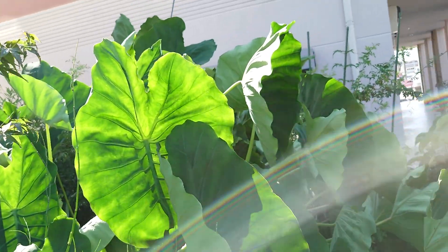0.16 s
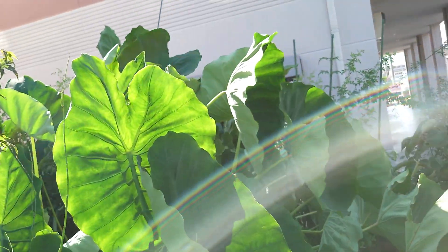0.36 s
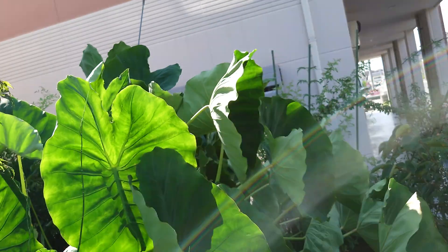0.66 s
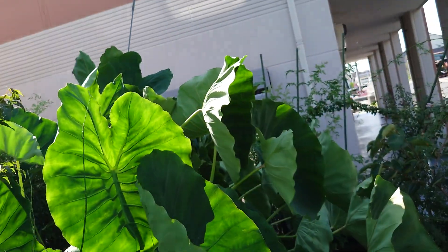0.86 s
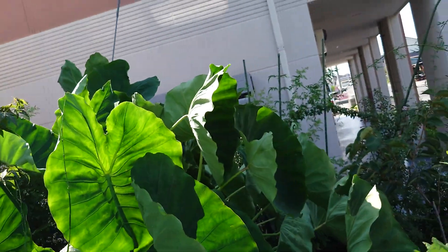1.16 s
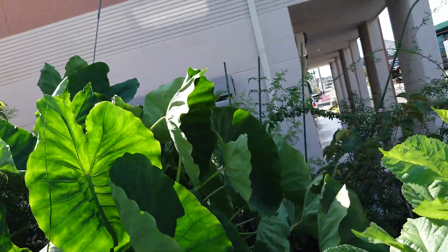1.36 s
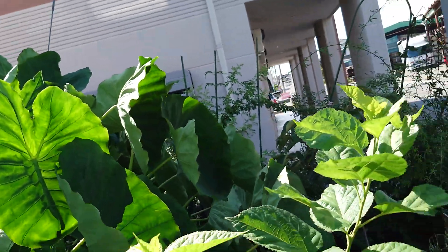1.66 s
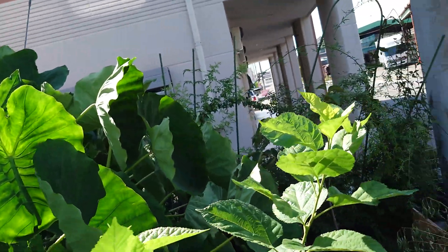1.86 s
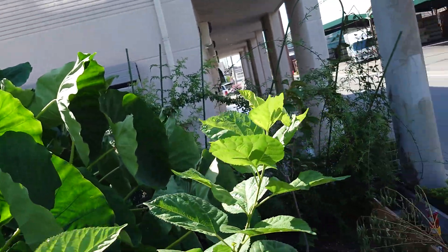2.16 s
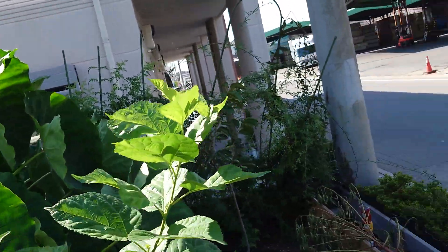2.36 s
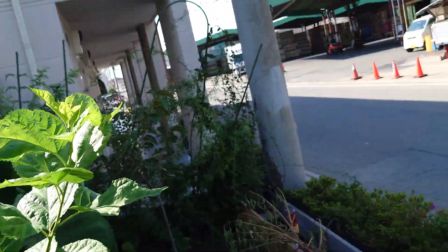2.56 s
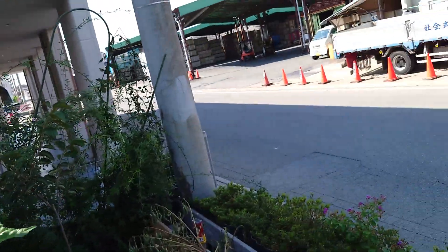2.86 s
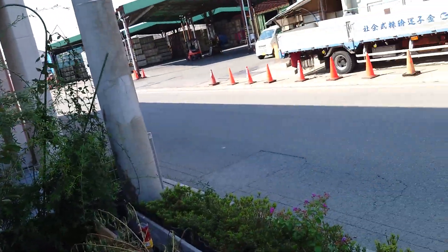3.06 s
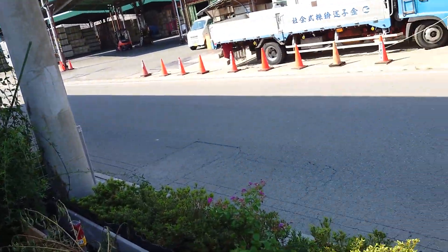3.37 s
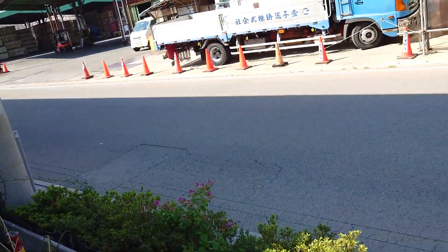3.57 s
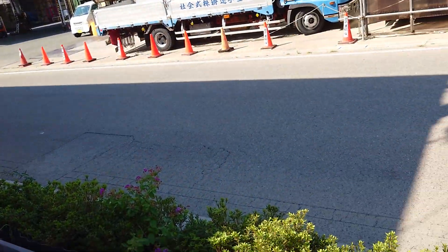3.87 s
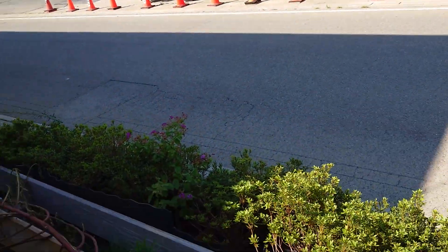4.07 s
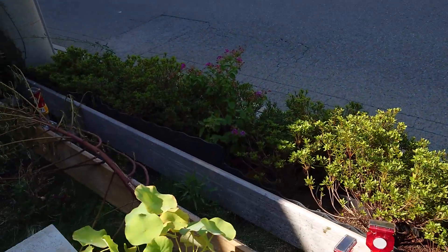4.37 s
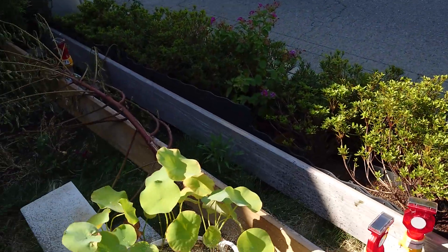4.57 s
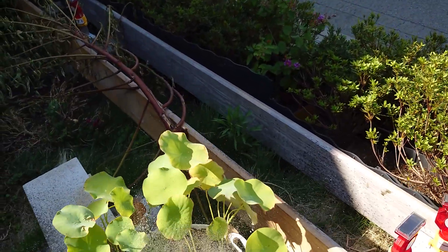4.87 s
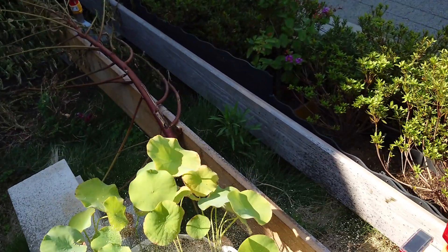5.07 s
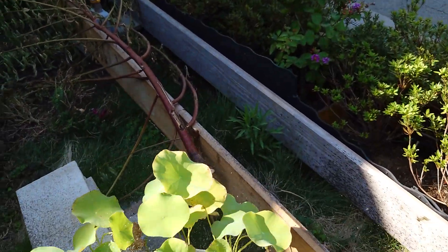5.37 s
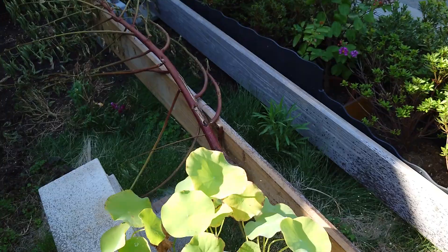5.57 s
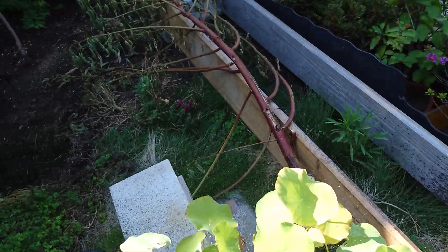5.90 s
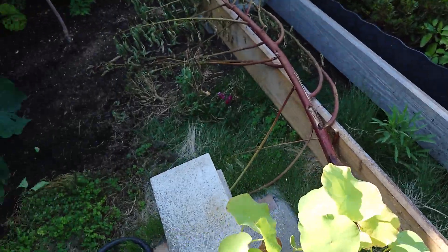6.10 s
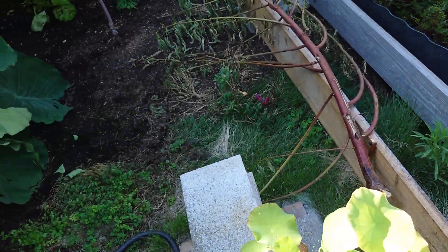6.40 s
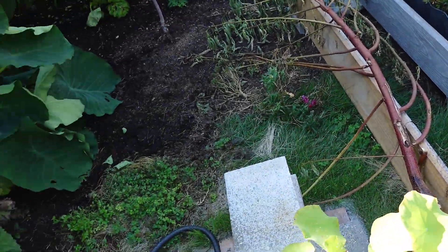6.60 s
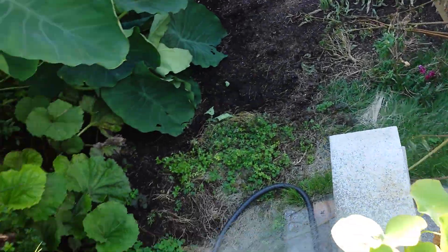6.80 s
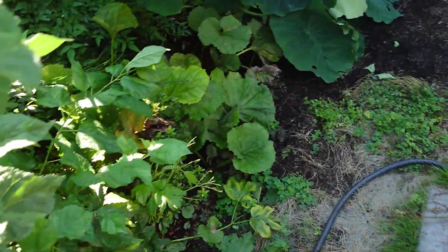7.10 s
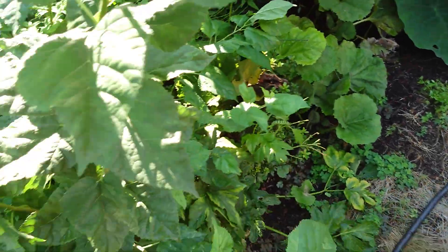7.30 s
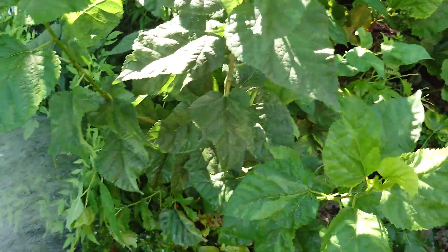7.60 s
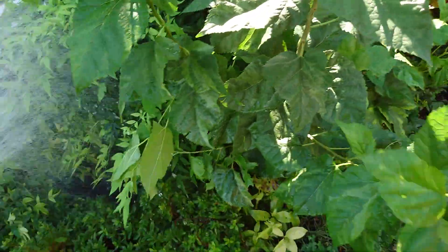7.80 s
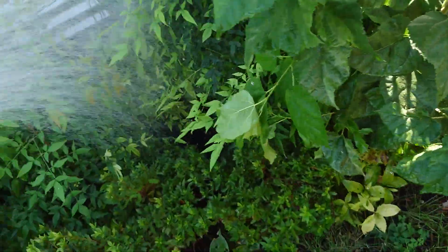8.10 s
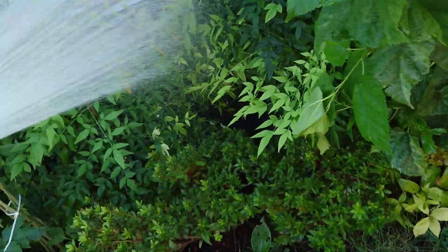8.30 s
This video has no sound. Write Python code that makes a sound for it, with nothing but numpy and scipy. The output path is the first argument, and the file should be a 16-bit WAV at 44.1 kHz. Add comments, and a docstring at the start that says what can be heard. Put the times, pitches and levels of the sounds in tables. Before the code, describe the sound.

Close outdoors, a hose spray pours onto broad leaves with dense splash, patter and hollow ringing. The aim wanders, then flicks in rapid pulses across nearer leaves, growing louder before falling back to a softer, hollower shower on shrubs. Stray drops smack and thud. A very faint motor hum comes from across the street, and light wind bumps the handheld stereo microphone.

```python
"""A dense splash of hose water on broad leaves, with the hollow ring of a leaf under the jet, opens the scene.
The aim drifts and flicks to and fro; random drop impacts, filtered by size, make mist, splash, patter and drumming.
Narrow resonances driven by impacts make the taut leaves ring, and shaped noise makes the nozzle hiss.
Behind the water two sine lines hum across the street over shaped noise; light air, as low noise,
rumbles in the two microphone ports."""
import sys
import numpy as np
from scipy import signal
from scipy.fft import rfft, irfft, next_fast_len
from scipy.io import wavfile
from scipy.ndimage import map_coordinates

SR = 44100
rng = np.random.default_rng(int(sys.argv[2]) if len(sys.argv) > 2 else 0)


def int16_out(signal):
    """Quantize to a 16-bit WAV file."""
    q = np.round(np.clip(np.atleast_2d(signal).T, -1, 1) * 32767)
    wavfile.write(sys.argv[1], SR, q.astype(np.int16))


N = 372644


def amp(db):
    """Decibels to amplitude ratio: 20 dB is a factor of ten."""
    return 10 ** (np.asarray(db) / 20)


def unit(pair):
    """Normalisation of a stereo pair so that its middle has rms 1."""
    middle_power = np.mean(pair.mean(0) ** 2)
    return pair / np.sqrt(middle_power + 1e-20)


def curves(rows):
    """Linear interpolation in time: one value per sample for each column after the time."""
    s, *cols = np.transpose(rows)
    return [np.interp(np.arange(N) / SR, s, c) for c in cols]


def bell(s, length):
    """Gaussian swell of height 1 around time s; length [s] is its full width at half height."""
    return np.exp2(-(2 * (np.arange(N) / SR - s) / length) ** 2)


def wobble(rate):
    """Slow random modulation: a spline through normal draws, rate knots a second."""
    knots = rng.standard_normal(int(N * rate / SR) + 4)
    return map_coordinates(knots, [np.arange(N) * rate / SR])


def colour(x, points, size=4096):
    """Minimum-phase filter, by the folded cepstrum, with gain through (Hz, dB) points on a log axis."""
    hz, db = np.transpose(points)
    log_bins = np.log(np.fft.rfftfreq(size, 1 / SR) + 1)
    gain = amp(np.interp(log_bins, np.log(hz), db))
    cepstrum = irfft(np.log(gain))
    # folding the negative times onto the positive ones makes the filter causal
    cepstrum[1:size // 2] *= 2
    cepstrum[size // 2 + 1:] = 0
    impulse = irfft(np.exp(rfft(cepstrum)))
    return signal.oaconvolve(np.atleast_2d(x), impulse[None], axes=1)[:, :N]


def pan(pair, left_db):
    """Interaural level difference: left_db is left minus right, split evenly between the sides."""
    return pair * amp(np.array([[.5], [-.5]]) * left_db)


def channel_filters(pair):
    """Fixed filters: a deep notch at 7.8-8.6 kHz on the left, a 2.2-2.7 kHz peak on the right; then rms 1."""
    # response of each channel: (frequency [Hz], gain before normalisation [dB])
    left_response = [(750, 0.5), (1300, -1), (1550, -3.5), (2150, -3), (2800, 3), (4600, 2.5), (6000, 5),
                     (7150, 7.5), (7480, 3), (7800, -19), (8600, -29), (9200, -7), (10200, 2), (15500, 2.5)]
    right_response = [(750, 0.5), (1100, 3), (1600, 2.5), (2250, 7.5), (2700, 7), (4000, -1.5), (5500, -5),
                      (6800, -4.5), (7950, 3), (9400, 0), (10800, 6), (13000, 4.5), (15500, 5)]
    return unit(np.vstack([colour(pair[0], left_response), colour(pair[1], right_response)]))


def drops(rate, size_db, spread_ms, clump_db, clump_rate):
    """Shot noise: impacts of random size and sign arrive in clumps, scattered in arrival-time difference."""
    # where the water lands: (time [s], lead of the left channel over the right [ms])
    bearing = [(0, 0.08), (1.3, 0.11), (2.3, 0.22), (2.6, 0.17), (3.1, 0.052), (4.2, 0.19), (4.6, 0.11),
               (5.8, 0.081), (6.1, -0.02), (6.85, -.03), (7, 0.13), (7.6, 0.3), (8, 0.38), (8.45, 0.43)]
    lead_ms, = curves(bearing)
    at = rng.integers(0, N, int(rate * N / SR))
    size, place, sign = rng.standard_normal((len(at), 3)).T
    level_db = size_db * np.clip(size, -2.5, 2.5) + clump_db * wobble(clump_rate)[at]
    push = np.sign(sign) * amp(level_db)
    lag = np.round((lead_ms[at] + spread_ms * place) * SR / 1000).astype(int)
    left = np.bincount(at, push, N)
    right = np.bincount((at + lag) % N, push, N)
    return np.array([left, right])


def ring(x, centre_hz, width_hz):
    """Heterodyne resonance: shift the band to zero, low-pass and shift back, so the centre may glide."""
    turn = np.exp(2j * np.pi * np.cumsum(centre_hz * np.ones(x.shape[-1])) / SR)
    low_pass = signal.butter(2, width_hz / 2, fs=SR, output="sos")
    return (signal.sosfilt(low_pass, x / turn) * turn).real


def machine():
    """Tonal radiation of a distant motor: a fundamental and its octave, slightly unsteady, over street noise."""
    # the hum swells and fades: (time [s], fundamental rms before wobble [dB], octave rms before wobble [dB])
    hum_levels = [(0, -90, -72), (.35, -82, -66.5), (1.35, -81.5, -71.5), (2.1, -77, -83), (2.42, -74, -88),
                  (2.82, -72, -67.5), (3.15, -67, -66.5), (3.75, -66, -67), (4.15, -67.5, -70.5),
                  (4.55, -70, -66), (4.9, -69, -71), (5.25, -72.5, -74), (5.7, -72, -76), (6.0, -74, -70),
                  (6.2, -87, -71.5), (6.7, -81, -75), (7.1, -88, -70), (8.45, -85, -67)]
    # murk of the street: (frequency [Hz], relative density [dB])
    street_spectrum = [(20, 6.5), (60, -3.5), (115, 3), (150, -3.5), (260, -8.5), (320, 2.5), (450, 2),
                       (900, -9), (3000, -7), (12000, -43)]
    hum_hz = 172.75  # mean; the pitch wobbles around it
    first_db, octave_db = curves(hum_levels)
    phase = 2 * np.pi * np.cumsum(hum_hz * (1 + .0015 * wobble(3))) / SR
    first = amp(first_db + 1.0 * wobble(3.77)) * np.sin(phase)
    octave = amp(octave_db + 0.52 * wobble(4)) * np.sin(2 * phase)
    # a part common to both channels and a part of each channel's own
    street = rng.standard_normal(N) + 0.81 * rng.standard_normal((2, N))
    return np.sqrt(2) * (first + octave) + amp(-65) * unit(colour(street, street_spectrum))


def breeze():
    """Turbulent pressure, independent at each port, rumbles in puffs; the hard ones flutter higher."""
    # puffs of air: (time [s], buffet level [dB], width at half height [s], left minus right [dB])
    puffs = [(0.923, -66, .12, 14), (1.04, -57, 0.087, 14), (1.315, -58.5, 0.089, 10),
             (1.45, -63, 0.11, 11), (1.574, -55.5, 0.055, 13), (1.675, -57, 0.052, 18),
             (1.86, -65, 0.12, 13), (2.33, -75, .2, 11), (3.026, -69, .35, -4), (3.75, -67, .2, -3),
             (5.424, -55, 0.052, -7), (6.77, -69, 0.16, 15), (7.022, -68, .15, 16), (7.193, -57, 0.082, 11),
             (7.29, -65, 0.12, 11), (7.624, -62, .1, 14), (7.76, -66, 0.19, 17), (8.136, -74, 0.74, 15)]
    # spectra of the rumble and of the eddies in hard puffs: (frequency [Hz], relative density [dB])
    buffet_spectrum = [(15, 6.5), (35, 12), (55, -2), (110, -21), (170, -37), (400, -44), (1500, -94)]
    eddy_spectrum = [(30, -10), (70, 7), (110, -6.5), (170, -17.5), (400, -35), (1500, -80)]
    calm_db, calm_left_db = -79.5, 5  # air between the puffs; left minus right
    # eddy level in a puff of the onset strength; the exponent makes eddies grow faster than the puff
    eddy_db, eddy_onset_db, eddy_growth = -64.5, -54.5, 1.8
    gust = sum(pan(amp(db) * bell(s, length), left_db) for s, db, length, left_db in puffs)
    rumble = unit(colour(rng.standard_normal((2, N)), buffet_spectrum))
    eddies = unit(colour(rng.standard_normal((2, N)), eddy_spectrum))
    steady = pan(amp(calm_db), left_db=calm_left_db)
    flutter = amp(eddy_db) * (gust / amp(eddy_onset_db)) ** eddy_growth
    return (gust + steady) * rumble + flutter * eddies


def surroundings(pair, echo_db, drift_ms, paths_ms):
    """Early reflection: leaves, ground and wall return weak copies whose delays drift at random."""
    out = pair.copy()
    for side in range(2):
        for path_ms in paths_ms:
            delay = np.round((path_ms + drift_ms * wobble(1.2)) * SR / 1000).astype(int)
            out[side] += amp(echo_db) * pair[side, (np.arange(N) - delay) % N]
    return out


def nozzle():
    """Jet turbulence: water tearing out of the small holes of the spray head gives shaped noise."""
    # strength of the spray head: (time [s], hiss level before a 3 dB cut [dB])
    hiss_levels = [(0, -59), (1, -53), (2, -56), (2.6, -56), (3, -61), (3.2, -56), (3.8, -62), (3.95, -72),
                   (4.5, -48), (6.9, -53.5), (7.4, -51), (8.45, -49.5)]
    # colour of the hiss: (frequency [Hz], relative density [dB])
    hiss_spectrum = [(2000, -21.5), (3100, 0), (4000, -22), (5000, -7.5), (5500, 4), (6400, -2.5),
                     (7100, 0), (8000, -19), (9500, -10), (15000, -11)]
    hiss_db, = curves(hiss_levels)
    hiss = channel_filters(colour(rng.standard_normal((2, N)), hiss_spectrum))
    return amp(hiss_db - 3) * pan(hiss, left_db=2.5)


def fat_drops():
    """Impact and free decay: a stray drop smacks a near leaf with a spatter, and the blade thuds."""
    # single drops: (time [s], smack peak before a 3.5 dB cut [dB], starting level of each thud tone [dB])
    stray_drops = [(1.3985, -31, -65), (1.725, -24, -64), (2.7636, -22, -62), (3.5694, -27, -57),
                   (5.5414, -19, -53), (6.803, -29, -64), (7.898, -37, -72)]
    smack_spectrum = [(200, -10), (900, -4), (2100, 14), (4000, -25), (15000, -25)]  # (Hz, dB)
    out, t = np.zeros((2, N)), np.arange(SR // 10) / SR
    for s, db, thud_db in stray_drops:
        smack = rng.standard_normal((2, len(t))) * amp(-60 * t / 0.01)  # falls 60 dB in 10 ms
        smack = channel_filters(colour(smack, smack_spectrum))[:, :len(t)]
        tones = np.sin(2 * np.pi * 210 * t) + np.sin(2 * np.pi * 370 * t)
        thud = amp(thud_db - 60 * t / 0.075) * tones  # falls 60 dB in 75 ms
        out[:, round(s * SR):][:, :len(t)] += amp(db - 3.5) * smack / np.abs(smack).max() + thud
    return out


def contacts():
    """Forced resonance: a leaf rings while the jet bears on it, its pitch gliding as the jet slides along."""
    # the core of the jet on one taut leaf: (start [s], length [s], level [dB], first pitch [Hz],
    # last pitch [Hz], bandwidth [Hz], left minus right [dB])
    leaf_contacts = [(0, 0.1, -47, 2200, 2250, 450, 1), (.08, 0.48, -51.5, 2420, 2370, 450, 2),
                     (1.377, 0.88, -51, 2110, 2160, 380, -2), (1.965, 0.042, -53, 2260, 2190, 300, -5),
                     (2.244, 1.2, -61, 1020, 1010, 290, 2), (2.883, .5, -49.5, 2200, 2320, 380, -1),
                     (4.245, .12, -55, 1030, 990, 290, -2), (4.68, 0.47, -48, 2120, 2120, 442, -3),
                     (6.88, .34, -54.5, 980, 1010, 290, 0), (7.256, 0.37, -51, 1030, 1050, 265, -1.5),
                     (7.16, 0.11, -47.5, 2300, 2400, 450, 0), (7.656, 0.77, -57, 980, 986, 217, 1.5),
                     (7.693, 0.497, -46.5, 2280, 2280, 400, -0.5), (8.196, 0.25, -42, 2160, 2130, 420, 3)]
    fade_s = 0.044  # the jet slides on and off a leaf
    out, t = np.zeros((2, N)), np.arange(N) / SR
    impacts = drops(rate=6000, size_db=2.5, spread_ms=.05, clump_db=0.85, clump_rate=40)
    for start, length, db, first_hz, last_hz, width_hz, left_db in leaf_contacts:
        inside = np.minimum(t - start, start + length - t)  # time to the nearer edge, s
        hold = np.clip(inside / fade_s + .5, 0, 1)
        on = np.flatnonzero(hold)
        glide_hz = np.linspace(first_hz, last_hz, len(on))
        leaf = channel_filters(ring(impacts[:, on], glide_hz, width_hz))
        out[:, on] += amp(db) * np.sqrt(hold[on]) * pan(unit(leaf[:, :len(on)]), left_db)
    return out


def jet(water_db, swing_db):
    """Driven resonance: the sputtering core excites hollow bands; the low and high ones rise with the water."""
    # a middle ring, sinking as the jet slides along a leaf: (time [s], level [dB], centre [Hz])
    slide = [(0, -71, 1880), (2.1, -61, 1880), (2.4, -57, 1870), (4.5, -51.5, 1814), (7.2, -73.5, 1800),
             (7.5, -52, 1760), (7.9, -55, 1630), (8.15, -57, 1450), (8.45, -57, 1150)]
    # ring levels over the water level, and the share of a flick or gap that each follows
    low_db = water_db - 13.5 + 0.18 * swing_db
    high_db = water_db - 4.5 + 0.46 * swing_db
    middle_db, middle_hz = curves(slide)
    low_hits = drops(rate=4000, size_db=2.5, spread_ms=.08, clump_db=1.2, clump_rate=40)
    low = channel_filters(ring(low_hits, centre_hz=1003, width_hz=292))
    middle_hits = drops(rate=4000, size_db=0.5, spread_ms=0.018, clump_db=2.0, clump_rate=51)
    middle = channel_filters(ring(middle_hits, middle_hz, width_hz=430))
    high_hits = drops(rate=6000, size_db=6.5, spread_ms=.05, clump_db=1.7, clump_rate=40)
    high = channel_filters(ring(high_hits, centre_hz=2158, width_hz=450))
    return amp(low_db) * low + amp(middle_db) * pan(middle, left_db=5) + amp(high_db) * high


def aim():
    """Amplitude modulation by the aim: slow water level, and quick swings of splash and patter, all in dB."""
    # water striking the foliage as the aim wanders: (time [s], splash level before the swings [dB])
    water_levels = [(0, -49), (.9, -48.5), (1.55, -50), (2.1, -52.5), (2.38, -50.5), (2.6, -45),
                    (2.8, -47.5), (3.15, -46.5), (3.55, -46), (3.92, -49.5), (4.4, -46.5), (4.8, -48),
                    (5.25, -44), (5.9, -42), (6.3, -39.5), (6.83, -42), (7.33, -53), (8.45, -56.5)]
    # flicks of the wrist swing the fan across the nearest leaves:
    # (time [s], splash rise [dB], patter rise [dB], width at half height [s])
    flicks = [(0.027, 1, 5.5, 0.063), (1.625, 1.5, 5, 0.058), (2.66, 1, 0.5, 0.063), (3.832, 6, 0, 0.079),
              (4.055, 8, 0, .1), (4.288, 6.5, 2, 0.052), (4.51, 5, 2, 0.075), (4.704, 8, 3, 0.082),
              (4.905, 6, 0.5, 0.09), (5.11, 6.5, 6, 0.084), (5.328, 5.5, 5.5, .09), (5.55, 3, 0.5, 0.067),
              (5.777, 2.8, 3, .1), (5.992, 1.5, 4, 0.072), (6.247, 1, -1, .2), (7.07, 7, 6.5, 0.044),
              (7.135, 7.5, 8.5, 0.06), (7.208, 5, 4, 0.06)]
    # the fan swings into a gap between the shrubs: (time [s], drop [dB], width at half height [s])
    gaps = [(2.967, 9, 0.14), (3.95, 0.5, .1), (4.18, 1.5, .08), (4.375, 3, 0.07), (4.596, 2.5, 0.07),
            (6.945, 7.5, 0.077)]
    water_db, = curves(water_levels)
    flicks_db = sum(np.outer([splash_db, patter_db], bell(s, length))
                    for s, splash_db, patter_db, length in flicks)
    gaps_db = sum(drop_db * bell(s, length) for s, drop_db, length in gaps)
    return water_db, *(flicks_db - gaps_db)


def spray(water_db, swing_db, patter_swing_db):
    """Impact spectra by drop size: fine drops hiss, middling ones splash and patter, the heaviest drum."""
    # firm blades or fine twigs under the spray: (time [s], patter over water level [dB], mist over it [dB])
    foliage = [(0, 1.5, -5), (.17, 0.5, -3.5), (.35, 0.5, -4.5), (.9, 6, -6), (1.65, 5, -7), (2.0, 3, -7),
               (2.27, -3, 1.5), (2.55, 1.5, -4), (2.87, 3.5, -6.5), (3.1, -1.5, -6.5), (4.05, -2, -7),
               (4.9, 1, -4.5), (5.15, 1, -4.5), (5.6, -1, -5), (6.0, -1, -4.7), (6.9, -2, -4.5),
               (7.15, 4, -11), (7.45, 4, -5.5)]
    # the spray on broad, slack leaves: (time [s], drumming level before the swings [dB])
    slack = [(0, -57), (.18, -64), (.25, -55.5), (1, -48.5), (1.5, -51), (1.97, -58), (2.42, -61),
             (2.7, -56.5), (3.05, -61), (4.4, -60), (5.95, -57.5), (6.3, -61), (7.13, -59), (7.3, -62),
             (8.45, -72)]
    # water landing on the near leaves: (time [s], share of the power [0-1])
    near_share = [(0, 0.1), (3.6, 0.06), (4.4, 0), (4.8, 0.87), (5.2, 0.82), (6.8, 0.88), (7.25, 0.7),
                  (7.6, 0.3), (8.45, 0.2)]
    # impact spectra, slap being the splash on near leaves: (frequency [Hz], relative density [dB])
    mist_spectrum = [(4000, -32), (7000, -1.5), (9000, 0.5), (11000, -2), (15500, -2)]
    splash_spectrum = [(300, -28.5), (900, -10.5), (1800, -0.5), (2800, -6), (4200, 2.5), (5200, 0),
                       (7200, 2), (8300, -2.5), (9500, -8), (12000, -27), (16000, -33)]
    slap_spectrum = [(300, -25), (900, -8.5), (1800, -1), (3000, -2), (4000, 1.5), (5200, -3), (7000, -1.5),
                     (8500, -10.5), (11000, -13), (16000, -36)]
    patter_spectrum = [(250, -32.5), (600, -15), (900, -9), (1250, -4), (1520, 5), (1900, 1), (2500, -2),
                       (3200, -10.5), (5000, -38.5)]
    drum_spectrum = [(150, -24.5), (280, -22.5), (400, -11), (550, -12), (750, -0.5), (950, -1.5),
                     (1300, -5), (2200, -37)]
    blades_db, twigs_db = curves(foliage)
    splash_db = water_db + swing_db
    patter_db = water_db + blades_db + patter_swing_db
    # mist and drumming follow only a share of each flick or gap
    mist_db = water_db + twigs_db + 0.95 * swing_db
    drum_db = curves(slack)[0] + 0.32 * swing_db
    near = np.clip(curves(near_share)[0], 0, 1)
    mist = colour(drops(rate=22000, size_db=3.5, spread_ms=.2, clump_db=0.93, clump_rate=53), mist_spectrum)
    splash = colour(drops(rate=22000, size_db=0.5, spread_ms=.12, clump_db=.6, clump_rate=50), splash_spectrum)
    slap = colour(drops(rate=14000, size_db=3, spread_ms=.14, clump_db=0.97, clump_rate=50), slap_spectrum)
    patter = colour(drops(rate=14000, size_db=2.5, spread_ms=.09, clump_db=1.0, clump_rate=28), patter_spectrum)
    drum = colour(drops(rate=4000, size_db=2.5, spread_ms=0.13, clump_db=0.2, clump_rate=25), drum_spectrum)
    # the same water goes either to the far shrubs or to the near leaves
    far_landing = np.sqrt(1 - near) * pan(channel_filters(splash), left_db=-4.5)
    near_landing = np.sqrt(near) * pan(channel_filters(slap), left_db=-4.0)
    fine = amp(mist_db) * pan(channel_filters(mist), left_db=4 - 5 * near)
    middling = amp(splash_db) * (far_landing + near_landing) + amp(patter_db) * channel_filters(patter)
    return fine + middling + amp(drum_db) * channel_filters(drum)


def scene():
    """Superposition of the watering with its echoes, the street and the air."""
    water_db, swing_db, patter_swing_db = aim()
    water = spray(water_db, swing_db, patter_swing_db) + jet(water_db, swing_db)
    water = water + contacts() + nozzle() + fat_drops()
    echoed = surroundings(water, echo_db=-23.5, drift_ms=0.16, paths_ms=[1.7, 3.6, 7.5])
    return echoed + machine() + breeze()


def record(dry):
    """Band limitation: an ideal low-pass removes everything from 15.8 kHz up."""
    top_hz = 15800
    size = next_fast_len(N + SR // 2)
    passed = np.fft.rfftfreq(size, 1 / SR) < top_hz
    return irfft(rfft(dry, size) * passed, size)[:, :N]


dry = scene()
out = record(dry)
int16_out(out)
```